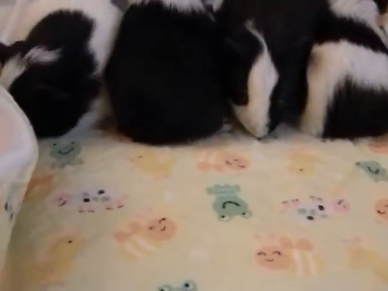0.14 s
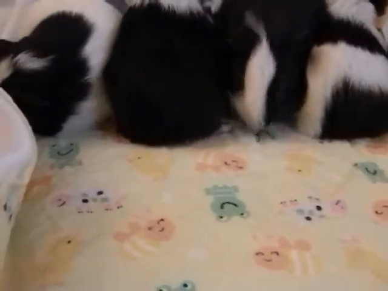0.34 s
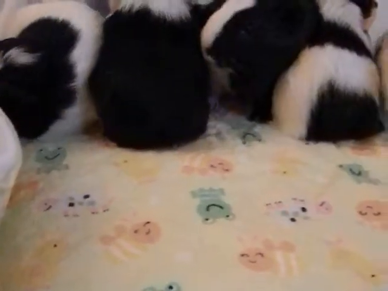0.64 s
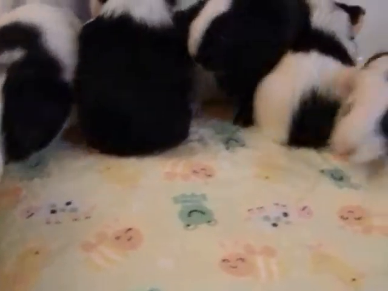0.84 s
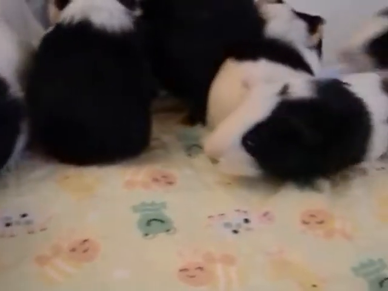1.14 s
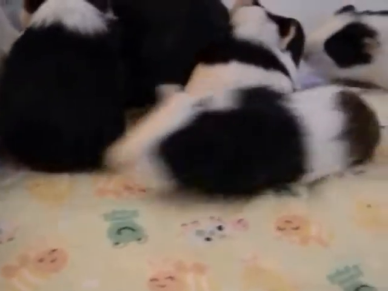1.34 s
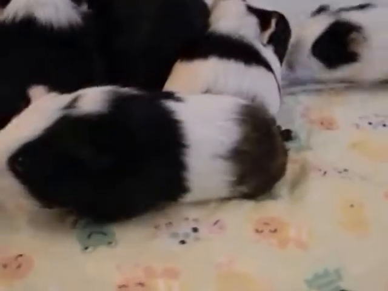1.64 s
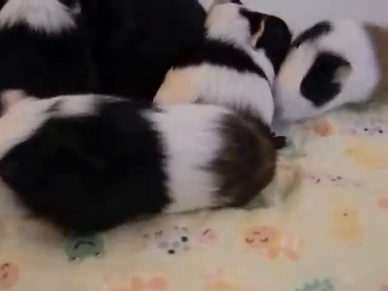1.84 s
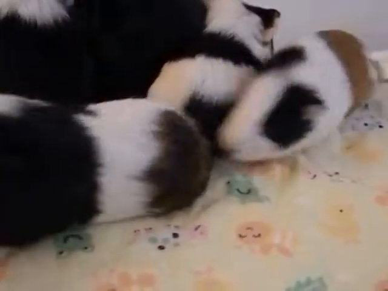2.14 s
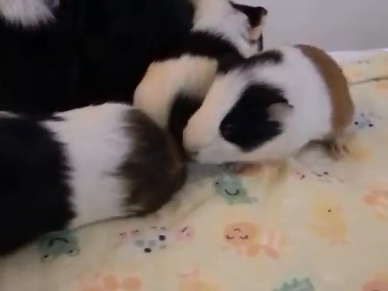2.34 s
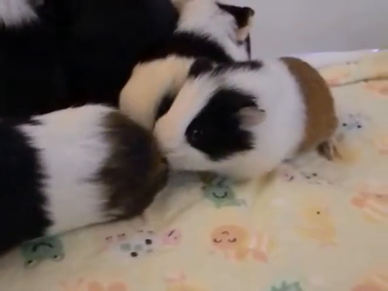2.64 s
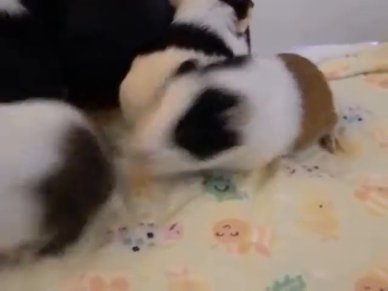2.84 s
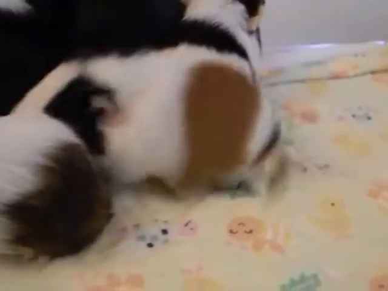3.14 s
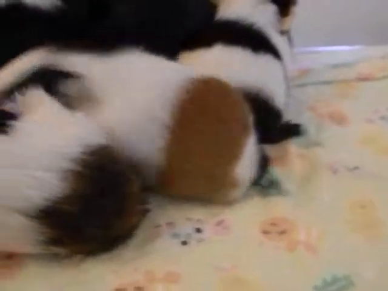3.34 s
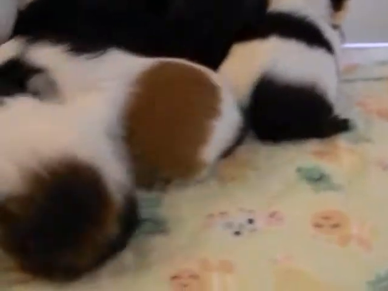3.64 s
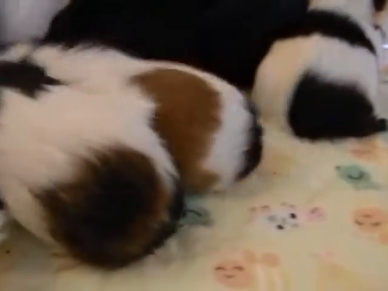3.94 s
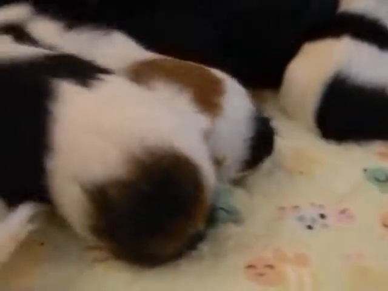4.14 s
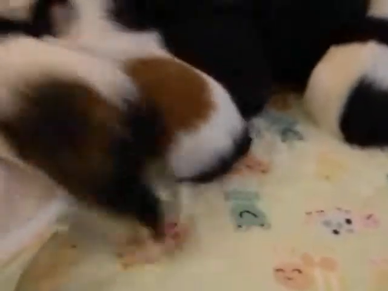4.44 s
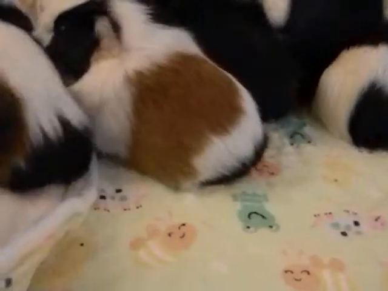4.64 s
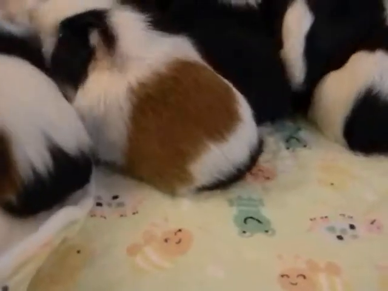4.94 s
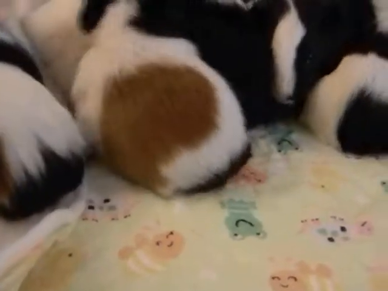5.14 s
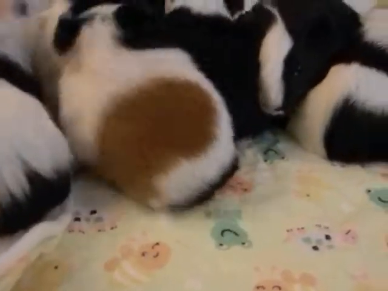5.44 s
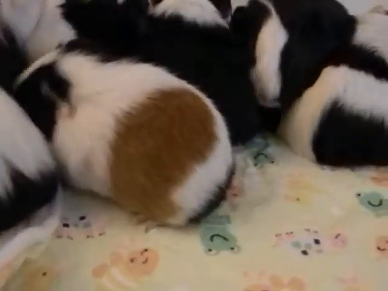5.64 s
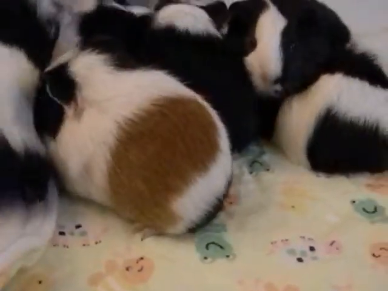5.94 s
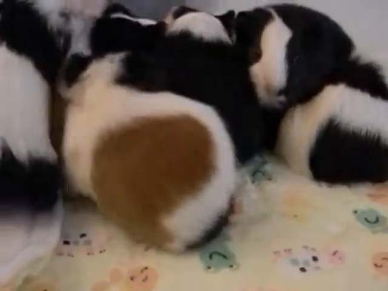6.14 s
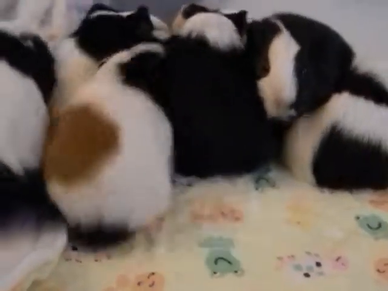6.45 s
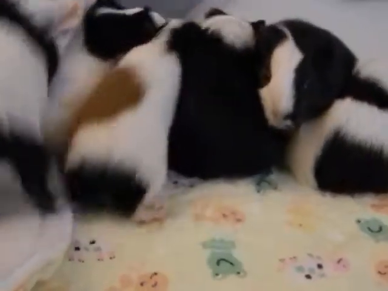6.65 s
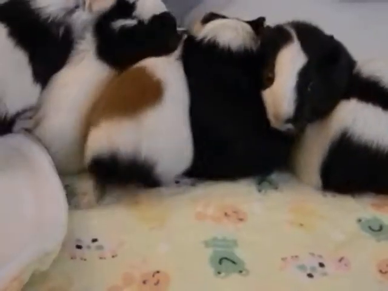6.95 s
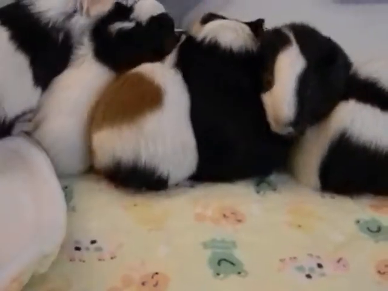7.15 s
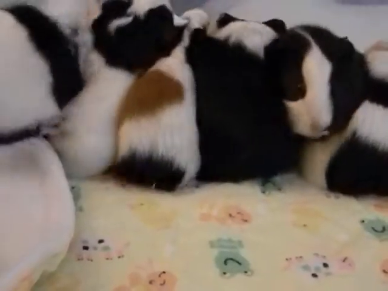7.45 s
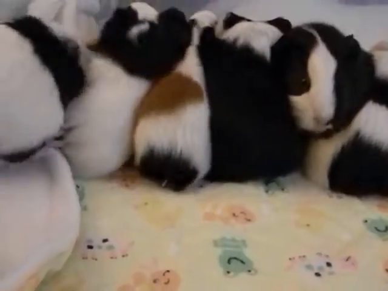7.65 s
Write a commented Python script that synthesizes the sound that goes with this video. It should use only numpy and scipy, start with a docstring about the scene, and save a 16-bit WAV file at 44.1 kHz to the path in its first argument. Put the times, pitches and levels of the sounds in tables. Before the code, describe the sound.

Close, busy guinea pig squeaking: short low chirps, calls climbing into thin whistles, murmuring chatter, and light paw thumps over soft steady noise.

```python
"""Short low chirps and whistles of guinea pig pups come first, over hoarse chatter from the rest.
The litter huddles on a quilted pad, close to a small camera with two microphone ports.
Chirps, whistles and long calls are vocal-fold tones with overtones; chatter is filtered fold pulses.
Raspy squeals and airy treble are grainy noise; paws thump and tick as decaying tones and noise snaps.
Behind them lie steady soft noise, strongest near 600 Hz, and short reflections from the pen."""
import sys
import numpy as np
from scipy import signal
from scipy.fft import rfft, irfft, next_fast_len
from scipy.io import wavfile
from scipy.ndimage import uniform_filter1d

SR = 44100
rng = np.random.default_rng(int(sys.argv[2]) if len(sys.argv) > 2 else 0)


def to_wav(sig):
    """Store sig (one row per channel, or 1-D mono) as 16-bit WAV at the path in sys.argv[1].

    Samples outside -1..1 are clipped; the rate is SR.
    """
    pcm = np.clip(np.atleast_2d(sig), -1, 1) * 32767
    pcm = np.round(pcm).astype(np.int16)
    wavfile.write(sys.argv[1], SR, pcm.T)  # frames by channels


def amplitude_ratio(level_db):
    """Convert a level in decibels to the matching linear amplitude (field) ratio."""
    exponent = np.asarray(level_db, float) / 20
    return 10 ** exponent


N = 343539  # length [samples]


def evened(x):
    """Scales to rms 1."""
    return x / np.sqrt(np.mean(x ** 2) + 1e-20)


def read(points, hz, axis=1):
    """Reads one column of a table over log frequency."""
    table = np.transpose(points)
    return np.interp(np.log(hz + 1), np.log(table[0] + 1), table[axis])


def add(mix, s, sound):
    """Mixes a sound in at time s [s]."""
    part = mix[round(s * SR):][:len(sound)]
    part += sound[:len(part)]


def wander(count, seconds):
    """Smooth chance of rms near 1 that changes over the given time [s]."""
    size = max(int(seconds * SR), 1)
    noise = rng.standard_normal(count + 2 * size)
    smooth = uniform_filter1d(uniform_filter1d(noise, size), size)
    return smooth[size:size + count] * np.sqrt(1.5 * size)


def coloured(x, points):
    """Filters by a spectrum and scales to rms 1."""
    size = next_fast_len(N)
    gain = amplitude_ratio(read(points, np.fft.rfftfreq(size, 1 / SR)))
    return evened(irfft(rfft(x, size) * gain, size)[:N])


def scoop(first, turn, last, u, at, bend_in, bend_out):
    """A curve that eases from first into turn at u = at and leaves it for last."""
    before = np.clip(1 - u / at, 0, 1)
    after = np.clip((u - at) / (1 - at), 0, 1)
    return turn + (first - turn) * before ** bend_in + (last - turn) * after ** bend_out


# how a pup's throat and mouth colour the overtones: (frequency [Hz], gain [dB])
THROAT_COLOUR = [(300, 29), (1200, -1), (1750, -4.5), (2500, -4.5), (3300, -5.5), (4300, -3), (4700, -15.5),
                 (4950, -33), (5400, -35), (6500, -23), (8000, -15), (11000, -29), (16000, -33)]
# a ring of the mouth that some callers show and others hide: (time [s], gain [dB])
MOUTH_RING = [(0, -2), (1.4, 4), (1.62, -3), (1.98, -4), (2.05, -19), (2.6, -6.5), (3.2, 4), (3.6, 4),
              (3.95, -4), (4.08, 11.5), (4.33, -9), (4.39, 13), (4.72, 6), (5.2, 5), (5.45, 6), (5.62, 12),
              (5.9, 10), (6.3, 5), (7.79, 9.5)]
RING_HZ, RING_OCTAVES = 1800, .22
OVERTONES_HOLD = 0.39  # share of a dip in the fundamental that the overtones do not follow
GLIDE_JITTER_HZ, GLIDE_FLUTTER_DB, FAST_GLIDE = 28, 3.5, 40  # folds falter in fast sweeps [octaves/s]


def squeak(rows, over_db, fall_db, hold=OVERTONES_HOLD):
    """Vocal folds give a fundamental and a series of overtones, which the throat and mouth colour."""
    s, hz, level_db = np.transpose(rows)
    edge_s, jitter_hz, flutter_db = .004, 4, 1.8
    t = np.arange(s[0] - edge_s / 2, s[-1] + edge_s / 2, 1 / SR)
    pitch = np.exp(np.interp(t, s, np.log(hz)))
    pitch = uniform_filter1d(pitch, size=260, mode="nearest")  # glides are rounded
    falter = np.clip(abs(np.gradient(np.log2(pitch))) * SR / FAST_GLIDE, 0, 1)
    jitter = (jitter_hz + GLIDE_JITTER_HZ * falter) * wander(len(t), 0.0032)
    phase = 2 * np.pi * np.cumsum(pitch + jitter) / SR
    db = np.interp(t, s, level_db)

    k = np.arange(2, 13)[:, None]  # harmonic numbers of the overtones
    partial_hz = k * pitch
    mouth = (pitch / 600) ** .1  # the mouth opens on high notes and lifts the throat's colours
    overtone_db = np.interp(t, s, over_db + 0 * s) + hold * (db.max() - db)
    overtone_db = overtone_db + fall_db * np.log2(k / 2) + read(THROAT_COLOUR, partial_hz / mouth)
    nearness = np.exp(-(np.log2(partial_hz / RING_HZ) / RING_OCTAVES) ** 2)
    overtone_db += np.interp(t, *np.transpose(MOUTH_RING)) * nearness
    overtones = amplitude_ratio(overtone_db) * (partial_hz < SR / 2.5) * np.sin(k * phase + k ** 2)
    flutter = np.array([wander(len(t), 0.004) for _ in k])  # each one flutters by itself
    overtones *= amplitude_ratio((flutter_db + GLIDE_FLUTTER_DB * falter) * flutter)

    fundamental = np.sin(phase) * amplitude_ratio((0.82 + GLIDE_FLUTTER_DB * falter) * wander(len(t), 0.00386))
    voice = fundamental + overtones.sum(0)
    voice *= amplitude_ratio(.8 * wander(len(t), .015) - GLIDE_FLUTTER_DB * falter / 2)  # effort wavers
    fade = np.clip(np.minimum(t - t[0], t[-1] - t) / edge_s, 0, 1)
    return max(t[0], 0), np.sqrt(2) * amplitude_ratio(db) * voice * fade


# low chirps close to the ports, each a scoop of pitch; levels before shaping, overtones before colouring:
# (start [s], length [s], level [dB], first pitch [Hz], turning pitch [Hz], last pitch [Hz],
#  first overtone over fundamental [dB])
LOW_CHIRPS = [(.004, 0.071, -23.5, 586, 545.5, 876, -14), (0.059, 0.066, -28, 572, 593, 753, -11.5),
              (0.145, 0.092, -24, 497, 506.5, 661, -8.5), (0.254, 0.047, -33, 520, 460, 610, -8),
              (0.309, 0.068, -22.5, 823, 565, 920, -9.5), (0.446, 0.039, -28, 857, 767, 750, -8.5),
              (0.531, 0.11, -25.5, 565, 517, 578, -12.5), (0.586, 0.063, -22.5, 619, 578, 650, -13),
              (0.682, 0.013, -27, 627, 625, 640, -20), (0.829, 0.058, -22, 676, 559, 578, -13),
              (0.888, 0.12, -24, 640.5, 578.5, 799, -7.5), (0.998, 0.064, -35.5, 392, 416, 412, -7),
              (1.073, 0.02, -33, 540, 582, 603, -2), (1.132, 0.075, -20, 657, 548.5, 585, -16.5),
              (1.181, 0.11, -22, 604.5, 525.5, 880, -11), (1.311, 0.049, -33, 555, 577, 797, 0.5),
              (1.394, 0.022, -29, 1480, 1480, 2000, -11), (1.614, 0.05, -31, 700, 532, 890, -11),
              (1.873, 0.074, -29, 692, 569, 1010, -25), (2.457, 0.037, -27.5, 507, 573, 610, -5),
              (2.551, 0.08, -23, 951, 563, 609, -10), (2.852, 0.06, -19, 604, 543, 586, -17),
              (3.079, 0.052, -21, 676, 570, 568, -21.5), (3.176, 0.092, -20, 804, 575.6, 860, -10),
              (3.371, 0.087, -22.5, 554, 484, 624, -12.5), (3.723, 0.057, -28.5, 813, 613, 622, -10),
              (3.78, 0.09, -22, 845, 595, 738, -10.5), (3.937, 0.093, -30.5, 597.5, 559, 565, -10.5),
              (4.056, 0.062, -19, 699, 553.5, 554, -13), (4.181, 0.026, -24.5, 750, 834, 620, -15),
              (4.298, 0.12, -24, 629.7, 577.7, 554, -10.5), (4.565, 0.0084, -14, 720, 744, 770, -12),
              (4.689, 0.053, -24, 602, 561, 557, -15), (4.849, 0.03, -28.5, 573, 705, 650, -23),
              (4.927, 0.043, -26.5, 645, 685, 540, -34), (5.063, 0.036, -24.5, 526, 607, 570, -14),
              (5.146, 0.042, -30, 614, 658, 810, -33), (5.185, 0.051, -24, 493, 493, 750, -14.5),
              (5.84, 0.078, -22, 638, 606, 607, -12), (6.062, 0.016, -26, 540, 568, 590, -21),
              (6.097, 0.063, -27.5, 754, 572, 790, -15), (6.254, 0.0158, -32, 930, 516, 503, -12),
              (6.301, 0.061, -24, 633, 510.5, 624, -10), (6.544, 0.022, -22.5, 530, 499, 515, -25),
              (6.636, 0.026, -25.5, 588, 573, 610, -9), (6.662, 0.062, -24, 570, 610, 615, -12),
              (6.909, 0.026, -28, 736, 743, 960, -9), (7.031, 0.073, -25.5, 824, 682, 670, -10.5),
              (7.176, 0.032, -40, 577, 587, 595, 0), (7.233, 0.018, -27, 502, 500, 585, -9),
              (7.517, 0.078, -25.5, 619, 650, 597, -5), (7.663, 0.057, -27.5, 569, 547.5, 646, -7)]
CHIRP_FALL_DB, CHIRP_BEND = -9.5, 2.7  # overtone slope [dB/octave]; how flat the scoop lies near its turn
CHIRP_DB_PER_OCTAVE = 1  # slightly stronger away from the turning pitch
CHIRP_SOFT_DB, CHIRP_SOFT_S = -6, .011  # soft start; the end softens by half as many dB


def chirp(start, length, level_db, first_hz, turn_hz, last_hz, over_db):
    """The folds follow one curve of pitch in octaves around a turning point, with soft ends."""
    u = np.linspace(0, 1, 40)
    down, up = np.log2([first_hz / turn_hz, last_hz / turn_hz])
    before, after = abs(down) ** (1 / CHIRP_BEND), abs(up) ** (1 / CHIRP_BEND)
    at = np.clip(before / (before + after + 1e-9), .02, .98)
    octaves = scoop(down, 0, up, u, at, CHIRP_BEND, CHIRP_BEND)
    soft_start = np.exp(-u * length / CHIRP_SOFT_S)
    soft_end = np.exp((u - 1) * length / CHIRP_SOFT_S) / 2
    db = level_db + CHIRP_DB_PER_OCTAVE * abs(octaves) + CHIRP_SOFT_DB * (soft_start + soft_end)
    rows = np.c_[start + u * length, turn_hz * 2 ** octaves, db]
    return squeak(rows, over_db, CHIRP_FALL_DB)


# long calls of the nearest pups, many climbing from a chirp into a whistle; one list of points a call:
# (time [s], pitch [Hz], level [dB], first overtone over fundamental before colouring [dB])
NEAR_CALLS = [
    [(1.45, 606, -25.5, -15), (1.48, 574, -25, -9), (1.52, 548, -18.5, -7), (1.56, 606, -21, -12),
     (1.58, 704, -25, -8.5), (1.592, 1110, -26, -16), (1.606, 1850, -28.5, -12)],
    [(1.7, 966, -29, -21), (1.715, 604.4, -23, -8.5), (1.75, 513, -21, -10), (1.79, 591.5, -19, -5.5),
     (1.81, 778, -24.5, -8), (1.825, 1453, -27.5, -3), (1.845, 2460, -41, 14), (1.86, 3040, -29.5, 6),
     (1.89, 3500, -28.5, 0), (1.93, 3680, -25, 5.5), (1.94, 3860, -24, -13), (1.948, 4020, -14, 0)],
    [(2.015, 617, -26, -20), (2.03, 575, -21.5, -6), (2.061, 537, -15.5, -11.5), (2.099, 563, -18, -10),
     (2.127, 712, -20.5, -8.5), (2.149, 777, -32.5, -3), (2.167, 1250, -27.5, -20), (2.189, 1314, -31, 1),
     (2.207, 1800, -33, -10)],
    [(2.285, 694, -31, -7.5), (2.299, 625.4, -20.5, -7), (2.339, 497, -19, -10.5), (2.371, 604, -22, -6.5),
     (2.391, 774, -23, -10), (2.415, 1339, -30, -4), (2.441, 2330, -34, 3), (2.467, 2830, -33.5, 3),
     (2.5, 3000, -37, 10), (2.525, 3150, -37, 6), (2.536, 3500, -29.5, -6)],
    [(2.622, 648, -19, -8), (2.66, 524, -20, -9), (2.695, 583, -15.5, -9.5), (2.71, 697, -23.5, -6),
     (2.754, 896, -31, -7), (2.768, 1365, -27, -6), (2.79, 2000, -37, 8), (2.808, 2395, -34.5, -4),
     (2.832, 2470, -26.5, -9), (2.842, 2538, -47, -3)],
    [(2.915, 566.5, -21, -9), (2.96, 536, -19.5, -10), (3.0, 625, -20.5, -10.5), (3.03, 825, -29.5, -3.5),
     (3.05, 920, -27, -5), (3.06, 1070, -25, -16)],
    [(3.33, 1530, -45, 3), (3.36, 1790, -35, -8), (3.385, 2676, -34, 4.5), (3.41, 3065, -48, 23.5),
     (3.435, 3350, -38, 6), (3.447, 3500, -34, -9), (3.454, 4100, -26, 0), (3.462, 3666, -35, -10)],
    [(3.548, 607, -20, -11), (3.59, 557, -16.5, -8.5), (3.62, 643, -21, -8), (3.645, 875, -25, -3),
     (3.655, 1400, -24, -15), (3.664, 1820, -35, -5)],
    [(4.139, 1690, -29, -17), (4.15, 2800, -38, -14), (4.172, 3280, -48, 7), (4.187, 2950, -37, -11),
     (4.198, 2630, -38, -6), (4.225, 2595, -32.5, -8), (4.24, 2890, -52, 11), (4.25, 2800, -41, -6),
     (4.256, 2413, -32, -13)],
    [(4.44, 1860, -34, -21), (4.456, 2842, -40, -19), (4.48, 3310, -40, -3), (4.51, 3760, -30, -18),
     (4.53, 3370, -34, -19), (4.546, 3070, -37, 3)],
    [(5.367, 638.5, -29, -16), (5.391, 579, -19.5, -13.5), (5.409, 538, -24, -11.5),
     (5.447, 638.5, -21, -12), (5.475, 678, -27, -10), (5.491, 826, -29, -7), (5.509, 1000, -25.5, -12),
     (5.516, 960, -27, -21)],
    [(5.592, 787, -43, -25), (5.605, 707, -26.5, -3), (5.63, 580, -20, -11.5), (5.68, 587.6, -21.5, -11.5),
     (5.705, 662, -24.5, -10), (5.722, 728, -25, -13)],
    [(6.37, 2850, -42, -5), (6.45, 2850, -43, -5), (6.48, 3050, -41, -5), (6.512, 3220, -43, -5)],
    [(7.296, 3030, -45, -7), (7.315, 3450, -41, -12), (7.325, 3850, -33, -25), (7.345, 3930, -32, -9),
     (7.365, 4260, -32, -12), (7.385, 4180, -29, -9), (7.41, 4470, -35, -1), (7.418, 4350, -28, 0)],
]
# slope of the higher overtones, call by call: (slope [dB/octave])
NEAR_CALL_SLOPES = [-9, -12.5, -6.5, -8, -7.5, -7.5, -11, -12.5, 0.5, 1, -10, -9, -7, 7]


def long_call(rows, fall_db):
    """The folds follow the call's own curve of pitch, effort and brightness."""
    rows = np.array(rows)
    return squeak(rows[:, :3], rows[:, 3], fall_db, hold=0)


# short whistles that rise, arch or fall around a middle pitch; the level is that at the middle pitch:
# (start [s], time to the middle [s], time after it [s], level [dB], first pitch [Hz], middle pitch [Hz],
#  last pitch [Hz], share of the approach that creeps [0-1],
#  first overtone over fundamental before colouring [dB])
SHORT_WHISTLES = [(0, 0.036, 0.0055, -35.5, 2800, 2835, 2940, 0.56, 6),
                  (0.078, 0.093, 0.0045, -26.5, 1305, 3930, 3850, 0.08, -15),
                  (0.382, 0.099, 0.0033, -24.5, 1125, 4000, 3860, 0.06, -12.5),
                  (.665, 0.043, 0.032, -40.5, 2260, 2930, 2630, 0.4, 1),
                  (0.931, 0.062, 0.0043, -25, 2250, 3920, 4080, 0.24, -26),
                  (1.235, 0.044, 0.053, -35, 2350, 3054, 2730, 0.34, 1),
                  (1.337, 0.053, 0.0018, -32, 2310, 3400, 3600, 0.93, -6),
                  (2.22, 0.047, 0.011, -46, 3300, 3580, 3600, .8, -15),
                  (2.646, 0.097, 0.016, -22, 2010, 4000, 2950, 0.1, -12.5),
                  (3.472, 0.026, 0.039, -37, 1510, 2650, 2320, 0.07, -12),
                  (3.895, 0.046, 0.0025, -38, 1780, 2930, 3020, 0.3, -1),
                  (6.212, 0.0026, 0.041, -43, 3160, 3130, 2650, .5, -1),
                  (6.235, 0.0027, 0.024, -40.5, 4250, 4180, 3720, .5, -3),
                  (6.285, 0.011, 0.006, -38, 3640, 4070, 4160, .8, -2),
                  (6.283, 0.0162, 0.0035, -34, 1600, 2130, 2200, 0.83, -12),
                  (6.028, 0.002, 0.011, -47.5, 3520, 3450, 3050, .5, -8),
                  (6.379, 0.0211, 0.0036, -36, 2230, 2820, 2870, 0.58, -10),
                  (6.856, 0.024, .012, -36, 3060, 3190, 3470, 0.6, -5),
                  (6.889, 0.026, 0.0094, -29, 3160, 3990, 3880, 0.75, -10),
                  (7.315, 0.0022, 0.03, -37, 3500, 3360, 2880, .5, -4),
                  (7.696, 0.0044, 0.061, -34.5, 2820, 2710, 1890, .5, -7)]
APPROACH_BEND, LEAVE_BEND = 3.8, 1.8  # how sharply the pitch levels off, and how late it leaves
WHISTLE_START_DB, WHISTLE_END_DB = -13, -5.5  # relative to the level at the middle pitch
WHISTLE_FALL_DB = -6.5  # overtone slope [dB/octave]


def whistle(start, approach, leave, level_db, first_hz, middle_hz, last_hz, creep, over_db):
    """A fast leap mixed with a steady creep brings the folds to a middle pitch as the voice swells."""
    u, at = np.linspace(0, 1, 40), approach / (approach + leave)
    leap_hz = scoop(first_hz, middle_hz, last_hz, u, at, APPROACH_BEND, LEAVE_BEND)
    creep_hz = np.where(u < at, first_hz + (middle_hz - first_hz) * u / at, leap_hz)
    pitch = (1 - creep) * leap_hz + creep * creep_hz
    db = level_db + np.interp(u, [0, at, 1], [WHISTLE_START_DB, 0, WHISTLE_END_DB])
    return squeak(np.c_[start + u * (approach + leave), pitch, db], over_db, WHISTLE_FALL_DB)


# raspy squeals that swell and break off; levels before the swell, which stays below them:
# (start [s], length [s], level [dB], centre [Hz])
RASPY_SQUEALS = [(0, 0.031, -44, 4930), (0.224, 0.19, -36.5, 4540), (0.606, 0.2, -45.5, 4900),
                 (4.36, 0.078, -50, 3900), (4.702, 0.033, -42, 3580), (4.752, .048, -40, 3800),
                 (4.895, .055, -43, 3600), (5.008, .03, -43, 3700), (5.06, .05, -45, 3800),
                 (7.621, 0.17, -47, 4800)]


def rasps():
    """Breath forced through half-shut folds: grainy treble noise, swelling to an abrupt end."""
    out = np.zeros(N)
    for start, length, db, hz in RASPY_SQUEALS:
        u = np.arange(0, length, 1 / SR) / length
        breath = rng.standard_normal(len(u)) * amplitude_ratio(2.8 * wander(len(u), 0.0043))
        for _ in range(2):
            breath = signal.lfilter(*signal.iirpeak(hz, 3, SR), breath)
        edge = np.clip(np.minimum(u, 1 - u) * length / .0055, 0, 1)
        swell_db = -7 * (2 - u)  # from 14 to 7 dB under the listed level
        add(out, start, amplitude_ratio(db + swell_db) * edge * evened(breath))
    return out


# bouts of chatter from the rest of the litter:
# (start [s], length [s], level [dB], open-mouth band over closed-mouth band [dB])
CHATTER_BOUTS = [(0, 0.086, -30.5, -6), (0.086, 0.19, -31, -16.5), (0.246, 0.18, -33.5, -6),
                 (0.524, 0.12, -32.5, -10.5), (0.603, 0.22, -28, -11.5), (0.859, 0.093, -29, -10.5),
                 (.96, 0.12, -30.5, -12.5), (1.061, 0.08, -24.5, -18), (1.15, 0.12, -27.5, -9),
                 (1.283, .11, -26, -15), (1.433, 0.096, -27.5, -16), (1.559, 0.12, -27.5, -26),
                 (1.696, 0.12, -29, -27), (1.804, 0.078, -32, 0), (1.869, 0.078, -28, -29),
                 (2.002, 0.11, -27.5, -14.5), (2.057, 0.058, -40, -14), (2.133, 0.082, -35.5, 3.5),
                 (2.274, 0.097, -26.5, -17), (2.392, 0.081, -31, -4), (2.461, 0.046, -32, -25),
                 (2.58, 0.078, -37, -0.5), (2.657, .13, -34, -3.5), (2.84, 0.085, -35, -4),
                 (2.919, 0.051, -24.5, -19), (2.99, 0.1, -30.5, -11.5), (3.095, 0.12, -33, -7.5),
                 (3.246, 0.16, -30.5, -6), (3.409, 0.089, -33, -5), (3.529, 0.054, -30, -5.5),
                 (3.652, 0.23, -32, -23), (3.777, 0.15, -35.5, -7.5), (3.977, 0.17, -32.5, -21),
                 (4.062, 0.14, -34, -11.5), (4.289, 0.094, -28, -26), (4.379, 0.088, -28.5, -13.5),
                 (4.54, 0.039, -26.5, -7), (4.588, 0.044, -33, -33), (4.693, 0.048, -26, -27),
                 (4.747, 0.049, -27, -14.5), (4.848, 0.17, -35, -15.5), (5.014, 0.11, -29, -24),
                 (5.136, 0.12, -35.5, -32), (5.365, 0.027, -34, -29), (5.443, 0.072, -31.5, -13),
                 (5.584, 0.039, -28, -29), (5.69, 0.026, -27, -19), (5.841, 0.064, -30, -26),
                 (5.917, 0.12, -33, -13.5), (6.067, 0.13, -31, -19), (6.207, 0.1, -37, -5.5),
                 (6.293, 0.076, -27.5, -27), (6.528, 0.072, -27, -17), (6.607, 0.19, -29.5, -9),
                 (6.798, 0.066, -27, -8), (6.86, 0.12, -32, -7.5), (6.98, 0.16, -31, -11),
                 (7.133, 0.18, -31.5, -8), (7.347, 0.12, -31.5, -12.5), (7.463, 0.088, -29.5, -13.5),
                 (7.554, 0.28, -30, -9)]
BOUT_RISE_S, BOUT_FADE_S = .011, .022
LULL_DB, LULL_UPPER_DB = -44, -54.5  # the murmur that stays between bouts


def bouts():
    """Gains of the closed-mouth and open-mouth chatter: bouts rise, hold and fade over a murmur."""
    t = np.arange(0, N, 64) / SR
    start, length, level_db, upper_db = np.transpose(CHATTER_BOUTS)[:, :, None]
    rise = (t - start) / BOUT_RISE_S + .5
    fade = (start + length - t) / BOUT_FADE_S + .5
    on = np.clip(np.minimum(rise, fade), 0, 1) ** 2
    gains = []
    for lull_db, db in ((LULL_DB, level_db), (LULL_UPPER_DB, level_db + upper_db)):
        power = amplitude_ratio(lull_db) ** 2 + (on * amplitude_ratio(db) ** 2).sum(0)
        gains.append(np.interp(np.arange(N) / SR, t, power ** .5))
    return gains


# colour of the chatter through closed mouths: (frequency [Hz], level [dB])
CLOSED_MOUTHS = [(250, -52), (330, 1.5), (450, 3.5), (620, -9), (850, 0), (1200, -10.5), (1700, -12),
                 (2300, -35.5), (3000, -61)]
# colour of the chatter through open mouths: (frequency [Hz], level [dB])
OPEN_MOUTHS = [(1500, 6.5), (2300, 11), (3000, 1.5), (3900, 7), (4500, -3), (5200, -14), (7000, -27)]


def chatter(count=4, hz=600, breath=0.25):
    """Several hidden pups: gliding, slightly hoarse fold pulses of uneven strength, mixed with breath."""
    spread, hoarse, chop_db = .15, .018, 3.2  # slow and fast wander of log pitch; wander of level
    pulses = np.zeros(N)
    for _ in range(count):
        pitch = hz * np.exp(spread * wander(N, .04) + hoarse * wander(N, .002))
        closing = np.diff(np.floor(np.cumsum(pitch) / SR), prepend=0)  # one pulse a cycle
        pulses += closing * amplitude_ratio(chop_db * wander(N, 0.031))
    puffs = rng.standard_normal(N) * amplitude_ratio(0.28 * chop_db * wander(N, 0.0044))
    drive = evened(pulses - pulses.mean()) + breath * evened(puffs)
    drive /= np.sqrt(uniform_filter1d(drive ** 2, size=2800))  # slow swings of level are evened out
    grains_db = wander(N, .004)  # it comes in small grains, coarser through open mouths
    closed_gain, open_gain = bouts()
    closed = closed_gain * coloured(drive * amplitude_ratio(grains_db), CLOSED_MOUTHS)
    return closed + open_gain * coloured(drive * amplitude_ratio(2 * grains_db), OPEN_MOUTHS)


# paws landing on the pad; levels before the soft onset and a gain of 1.38:
# (time [s], level [dB], ring [Hz], decay by 60 dB [s])
PAW_THUMPS = [(1.043, -21, 171, 0.019), (2.305, -23, 108, 0.07), (3.768, -36, 182, 0.06),
              (3.923, -22.5, 223, 0.032), (4.149, -23.5, 147, 0.067), (4.464, -32, 94.2, 0.089),
              (4.637, -32.5, 157, 0.075), (5.143, -37, 114, 0.097), (6.459, -6.5, 185, 0.025),
              (6.565, -32.5, 199, 0.06), (6.618, -33.5, 80.7, 0.094), (6.888, -26, 172, 0.048)]
# claw ticks on the pad; starting levels before the snap is filtered and the knock eased in:
# (time [s], snap [dB], knock [dB], knock pitch [Hz])
CLAW_TICKS = [(1.489, -23, -21, 900), (4.106, -27, -26, 800), (4.55, -14, -10, 1530),
              (4.647, -52, -10, 500), (4.879, -40, -31, 2210), (4.796, -50, -20, 1480),
              (5.321, -44, -20, 650), (5.786, -42, -18, 750), (5.812, -42, -19, 800),
              (6.099, -36, -30, 800), (6.459, -44, -17, 650), (6.539, -38, -14, 600),
              (6.643, -18, -17, 1500), (6.823, -14, -12, 1500), (7.463, -20, -25, 800),
              (7.73, -18, -26, 800)]


def paws(knock_t60=0.011, snap_hz=3000, snap_t60=0.006):
    """Thumps are a few dull low cycles; ticks a snap of noise over a short knock of the pad."""
    out, t = np.zeros(N), np.arange(SR // 5) / SR
    for s, db, hz, t60 in PAW_THUMPS:
        onset = np.clip(t / 0.0049, 0, 1)
        add(out, s, amplitude_ratio(db - 60 * t / t60) * np.sin(2 * np.pi * hz * t) * onset * 1.38)
    noises = rng.standard_normal((len(CLAW_TICKS), len(t)))
    for (s, db, knock_db, hz), noise in zip(CLAW_TICKS, noises):
        resonant = signal.lfilter(*signal.iirpeak(snap_hz, .9, SR), noise)
        snap = amplitude_ratio(db - 60 * t / snap_t60) * resonant
        snap = signal.lfilter(*signal.butter(1, 7000, fs=SR), snap)
        onset = np.clip(t / 0.00062, 0, 1)
        knock = onset * amplitude_ratio(knock_db - 60 * t / knock_t60) * np.sin(2 * np.pi * hz * t)
        add(out, s, snap + knock)
    return out


# level of airy treble noise over time, strongest with the whistle sweeps: (time [s], level [dB])
AIR_LEVEL = [(0, -54), (.16, -67), (.38, -51.5), (.5, -67), (.64, -60), (1.24, -56), (1.75, -60.5),
             (1.85, -52), (2.25, -62), (2.5, -59), (2.98, -60), (3.45, -58), (4.27, -60.5), (4.55, -51),
             (4.621, -63), (6.4, -61), (6.7, -59.5), (7.79, -59.5)]
# colour of the airy treble noise: (frequency [Hz], level [dB])
AIR_COLOUR = [(3000, -38), (5000, -3), (7000, -2.5), (9500, 1), (12000, -7.5), (14000, -12), (16000, 0.5)]


def airy_treble(grain_db=3.0):
    """Airy treble noise in fine grains of uneven size, its level rising and falling."""
    grains = rng.standard_normal(N) * amplitude_ratio(grain_db * wander(N, 0.0012))
    level_db = np.interp(np.arange(N) / SR, *np.transpose(AIR_LEVEL))
    return amplitude_ratio(level_db) * coloured(grains, AIR_COLOUR)


# colour of the steady soft noise, strongest near 600 Hz, with weaker rumble and thin hiss:
# (frequency [Hz], level [dB])
FLOOR_COLOUR = [(18, -50), (40, -20.5), (100, 0), (200, -6), (290, -5), (600, 10), (1500, -10.5),
                (4000, -22.5), (9000, -36), (16000, -54)]
FLOOR_DB = -36


def soft_floor():
    """Steady soft noise, strongest near 600 Hz, with weaker rumble and thin hiss, swelling a little."""
    return amplitude_ratio(FLOOR_DB + 1.6 * wander(N, 0.077)) * coloured(rng.standard_normal(N), FLOOR_COLOUR)


def pen(x, t60=0.059):
    """Sparse decaying reflections from the walls of the pen, different at each port."""
    at = np.arange(40, SR // 4, 22)
    taps = np.zeros((2, SR // 4 + 22))
    where = at + rng.integers(0, 22, (2, len(at)))
    np.put_along_axis(taps, where, rng.choice([-1., 1.], (2, len(at))), 1)
    taps *= amplitude_ratio(-60 * np.arange(taps.shape[1]) / SR / t60)
    return signal.fftconvolve(x[None], taps / np.linalg.norm(taps[0]), axes=1)[:, :N]


def scene():
    """Direct sound at both ports plus the pen's reflections of voices and airy treble."""
    pups = chatter() + airy_treble() + rasps()
    for row in LOW_CHIRPS:
        add(pups, *chirp(*row))
    for rows, fall_db in zip(NEAR_CALLS, NEAR_CALL_SLOPES):
        add(pups, *long_call(rows, fall_db))
    for row in SHORT_WHISTLES:
        add(pups, *whistle(*row))
    direct = pups + paws() + soft_floor()
    return direct + amplitude_ratio(-15) * pen(pups)


# the microphone port pair:
# (frequency [Hz], mean phase lead of the right [rad], left over right [dB], likeness [0-1])
PORT_PAIR = [(60, .1, 3.2, .95), (245, -.1, 3.8, .92), (285, 3.1, 4.5, .9), (400, 2.8, 4.6, .9),
             (600, 2.6, 5.6, .95), (1110, 2.3, 3.5, .88), (2270, 1.7, 1, .66), (3920, 1.2, 2.2, .75),
             (7400, .8, .3, .75), (11100, .3, .6, .8), (16200, 0, 0, .8)]
# strength of the random part added to the right port, doubled in use: (frequency [Hz], strength [0-1])
PORT_SCATTER = [(40, 0.6), (150, 0.4), (300, 0.04), (4600, 0.03), (6000, 1), (7500, 0.98), (10000, 0.8),
                (16000, 0.7)]
# the huddle shifts in front of the camera: (time [s], extra left over right [dB])
HUDDLE_LEAN = [(0, -1.1), (1, -1), (2.6, 1), (4.2, -0.3), (4.6, -0.5), (5.5, -0.1), (6.6, -0.5),
               (7.79, -1.1)]
DRIFT_FRAMES, DRIFT_BINS = 14, 14  # smoothing of the phase drift over time and frequency
EDGE_HZ = 15800  # the ports pass nothing from here up


def top_cut(x):
    """Nothing passes above the cut-off."""
    return signal.sosfilt(signal.butter(12, 16830, fs=SR, output="sos"), x)


def record(dry):
    """Ports matrixed for width: the right mostly weaker, its phase drifting as voices change place."""
    trimmed = signal.lfilter(*signal.butter(3, 52, "high", fs=SR), dry)  # deep bass below about 50 Hz falls away
    hz, t, z = signal.stft(trimmed, SR, nperseg=1024, noverlap=768)
    lead, balance_db, same = (read(PORT_PAIR, hz, axis=k)[:, None] for k in (1, 2, 3))
    chance = rng.standard_normal(z[1].shape[::-1]).T
    drift = uniform_filter1d(chance, DRIFT_BINS, axis=0)
    drift = evened(uniform_filter1d(drift, DRIFT_FRAMES, axis=1))
    lead = lead + drift * np.sqrt(-2 * np.log(same))  # less likeness, wider drift
    share = np.clip(read(PORT_SCATTER, hz), 0, 1)[:, None]
    random_phase = np.exp(2j * np.pi * rng.random(z[1].shape[::-1]).T)
    mixed = np.sqrt(1 - share ** 2) + 2 * share * random_phase
    lean_db = np.interp(t, *np.transpose(HUDDLE_LEAN))
    z[1] *= mixed * np.exp(1j * lead) * amplitude_ratio(-balance_db - lean_db)
    z *= (hz < EDGE_HZ)[:, None]
    mix = signal.istft(z, SR, nperseg=1024, noverlap=768)[1][:, :N]
    return top_cut(mix)


dry = scene()
out = record(dry)
to_wav(out)
```